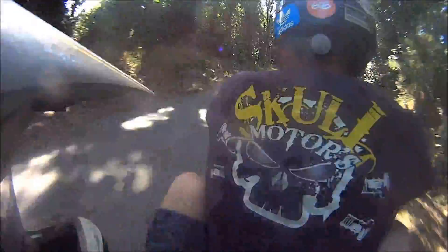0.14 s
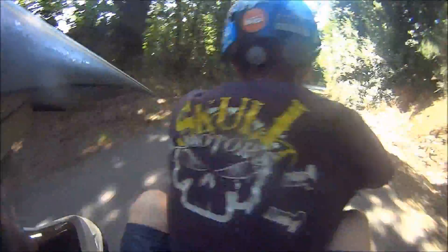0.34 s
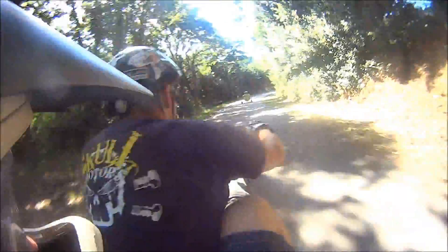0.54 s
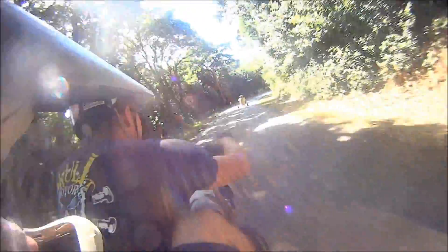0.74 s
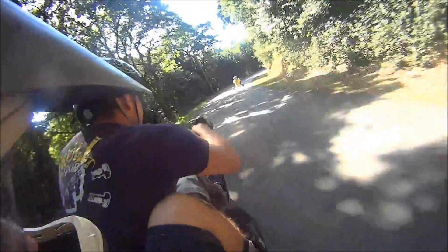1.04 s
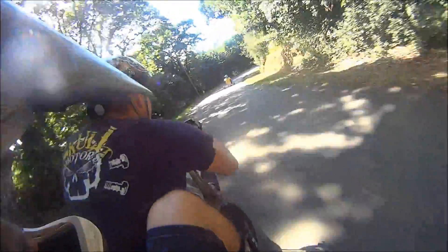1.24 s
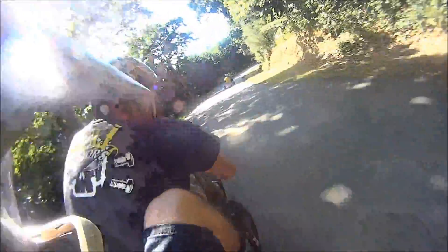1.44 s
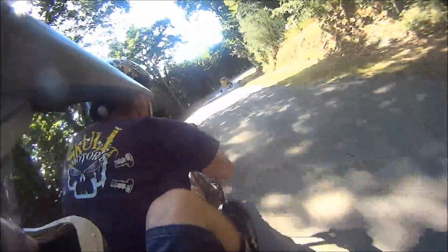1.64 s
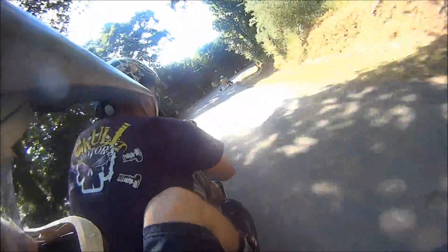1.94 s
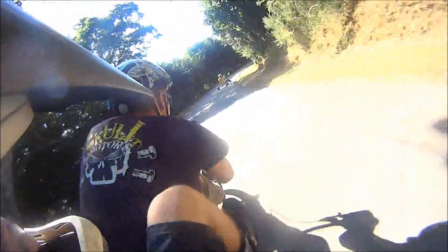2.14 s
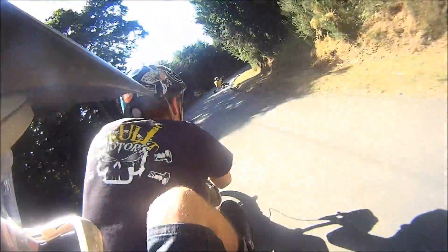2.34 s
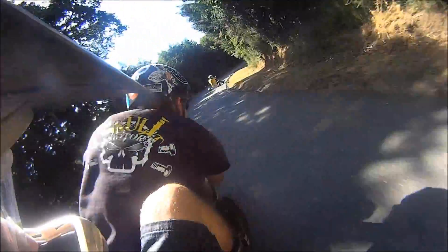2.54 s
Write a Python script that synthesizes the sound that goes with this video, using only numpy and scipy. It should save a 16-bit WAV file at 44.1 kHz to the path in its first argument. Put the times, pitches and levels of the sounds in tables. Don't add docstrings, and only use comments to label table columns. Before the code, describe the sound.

Close behind the wheels, a small stereo camera catches a harsh mid-pitched rolling roar and high whine, a burst of grit and pebble cracks early on, then loud mount knocks late, with wind and frame rumble throughout.

```python
import sys
import numpy as np
from scipy import signal
from scipy.fft import rfft, irfft, next_fast_len
from scipy.io import wavfile

SR = 44100
rng = np.random.default_rng(int(sys.argv[2]) if len(sys.argv) > 2 else 0)


def put_to_file(sound):
    columns = np.atleast_2d(sound).T
    safe = np.clip(columns, -1, 1)
    whole_steps = np.round(safe * 32767)
    wavfile.write(sys.argv[1], SR, whole_steps.astype(np.int16))


def level_to_linear(level):
    exponent = np.asarray(level, float) / 20
    return 10 ** exponent


N = 119070
TIME = np.arange(N) / SR
PAD = next_fast_len(N + 8192)
HZ = np.arange(PAD // 2 + 1) * SR / PAD + 1e-3


def curve(rows, share=1.0):
    s, db = np.transpose(rows)
    v = np.interp(TIME, s, db)
    return share * (v - v.mean())


def drift(rate_hz):
    r = np.exp(-80 * np.pi * rate_hz / SR)
    white = rng.standard_normal(N // 40 + 2002)
    v = signal.lfilter([1], [1, -2 * r, r * r], white)[2000:]
    return np.interp(np.arange(N) / 40, np.arange(len(v)), v / v.std())


def peak(hz, width_hz):
    detuning = (HZ ** 2 - hz ** 2) / (HZ * width_hz * 1.55)
    return (1 / (1 + 1j * detuning)) ** 2


def shaken(modes, phases, own, patchy_db, rate_hz):
    out = 0
    together = drift(rate_hz)
    for (hz, width, left, right), phase in zip(modes, phases):
        a, b = rfft(rng.standard_normal((2, PAD)))
        at_right = np.exp(1j * phase) * (np.sqrt(1 - own) * a + np.sqrt(own) * b)
        pair = np.array([level_to_linear(left) * a, level_to_linear(right) * at_right])
        ringing = irfft(pair * peak(hz, width), PAD)[:, :N]
        out = out + ringing * level_to_linear(patchy_db * (together + 0.38 * drift(rate_hz)))
    return out


def scattered(table, patchy_db, rate_hz):
    hz, left, right = np.transpose(table)
    place, centres = np.log(HZ), np.log(hz)
    white = rfft(rng.standard_normal((2, PAD)))
    white *= level_to_linear(np.array([np.interp(place, centres, db) for db in (left, right)]))
    white *= np.minimum(HZ / hz[0], 1) ** 3 * np.minimum(hz[-1] / HZ, 1) ** 3
    out = 0
    for k in range(len(hz)):
        part = np.sqrt(np.interp(place, centres, np.arange(len(hz)) == k))
        band = irfft(white * part * 1j ** k, PAD)[:, :N]
        out = out + band * level_to_linear(patchy_db * np.array([drift(rate_hz), drift(rate_hz)]))
    return out


# time in seconds, level in dB.
GUST = [(0.0, -27.5), (0.05, -33.5), (0.28, -42), (0.34, -27.5), (0.38, -38.5), (0.45, -30.5), (0.52, -49),
        (0.63, -51.5), (0.65, -42), (0.93, -29), (0.97, -46), (1.12, -31.5), (1.4, -40), (1.42, -38.5),
        (2.05, -23.5), (2.13, -39), (2.48, -27.5), (2.7, -39.5)]
# frequency in Hz, left level in dB, right level in dB.
PORTS = [(45, -24, -19), (113, -23, -20.5), (238, -19.5, -18), (314, -14, -8), (509, -16, -16.5),
         (653, -17.5, -11.5), (904, -29.5, -34.5), (1300, -40, -47)]


def wind():
    turn = 2 * np.pi * np.cumsum(30 + 5.1 * drift(8.6)) / SR
    flap = np.sin(turn) * level_to_linear(-31 + 1.3 * drift(9.0))
    low = shaken([(30, 18, -12, -12)], [0.2], own=0.25, patchy_db=0.8, rate_hz=4)
    buffet = (flap + low) * level_to_linear(curve(GUST, 0.89))
    turbulence = scattered(PORTS, patchy_db=2.0, rate_hz=17.6)
    return buffet + turbulence * level_to_linear(curve(SHAKE, 0.2))


# time in seconds, level in dB.
SPRAY = [
    (.3, -66),
    (0.499, -46.5),
    (.53, -39),
    (.6, -39.5),
    (.66, -46),
    (.8, -46),
    (1., -62.5),
]


def spray():
    s, db = np.transpose(SPRAY)
    white = rng.standard_normal((2, N))
    grit = white * level_to_linear(np.interp(TIME, s, db) + 2.5 * drift(40.0))
    band = signal.butter(2, [5500, 9000], "band", fs=SR, output="sos")
    return signal.sosfilt(band, grit)


# start in seconds, peak level in dB.
TICKS = [(0.398, -28.5), (0.5213, -7.5), (0.6424, -30), (0.665, -8.5), (0.6652, -37.5), (0.7364, -36.5),
         (1.2344, -22), (1.882, -26.5), (1.9759, -44), (2.212, -26), (2.449, -32.5)]


def ticks():
    length, t60_s, top_db = 1500, 0.06, -24
    t = np.arange(length) / SR
    out = np.zeros((2, N + length))
    for s, db in TICKS:
        a, b = rng.standard_normal((2, length)) * np.minimum(t / 0.00067, 1)
        decay = level_to_linear(min(db, top_db) - 9 - 60 * t / t60_s)
        i = int(s * SR)
        out[:, i:i + length] += np.array([a, 0.76 * a + 0.69 * b]) * decay
    band = signal.butter(2, [3800, 7500], "band", fs=SR, output="sos")
    return signal.sosfilt(band, out)[:, :N]


# time in seconds, left snap and right snap in amplitude,
# ring level in dB, rebound as a share of the snap.
KNOCKS = [
    (.2258, -.12, .04, -18.5, 1.6),
    (.3325, -.32, .22, -24, .9),
    (.3386, .28, .3, -24, .7),
    (.3755, -.14, .08, -19, 1.1),
    (.4152, -.28, .12, -11, .9),
    (1.8392, -.55, .25, -10, .4),
    (1.9915, -.03, -.12, -14, .5),
    (2.0418, -.75, .45, -12.5, .22),
    (2.196, -.05, -.1, -24, .5),
]
REBOUND_S = [.0011, .0016]


def knocks():
    length, snap_s = 2600, 0.0014
    ring_hz, crest_s = 300, 0.0065
    ring_side_db = np.array([-4.5, 0])
    t = np.arange(length) / SR
    snap, *back = [np.sin(np.pi * np.clip((t - lag) / snap_s, 0, 1)) ** 2 for lag in [0, *REBOUND_S]]
    swell = (t / crest_s * np.exp(1 - t / crest_s)) ** 2
    ring = swell * np.cos(2 * np.pi * ring_hz * (t - crest_s))
    clack = 1.15 * np.exp(-t / 0.003) * np.sin(2 * np.pi * 830 * t)
    out = np.zeros((2, N + length))
    for s, left, right, db, rebound in KNOCKS:
        blow = np.array([[left], [right]]) * (snap - rebound * np.array(back))
        hollow = np.outer(level_to_linear(db + ring_side_db), ring)
        i = int((s - snap_s / 2) * SR)
        out[:, i:i + length] += blow + hollow + min(left, 0) * min(rebound, 1) * clack
    hits = rng.random((2, N)) < 60 / SR
    jolts = hits * rng.standard_normal((2, N)) * level_to_linear(-34.5 + curve(SHAKE, 0.15))
    jolt_rings = signal.fftconvolve(jolts, ring[None])[:, :N]
    return out[:, :N] + jolt_rings * level_to_linear(np.array([[-8.0], [0.0]]))


# time in seconds, level in dB.
SHAKE = [(0, -35), (.09, -42), (.2, -35), (.45, -38), (.58, -50), (.635, -54), (.66, -30), (.93, -28),
         (1.04, -31), (1.08, -41), (1.11, -27), (1.22, -29), (1.27, -39), (1.55, -34), (2.1, -32),
         (2.3, -38), (2.43, -30), (2.7, -38)]
# frequency in Hz, width in Hz, left level in dB, right level in dB.
FRAME_MODES = [(78, 47, -13.5, -14), (113.5, 76, -18, -19), (153.5, 82, -19, -12), (231.5, 35, -17, -18.5)]
FRAME_PHASE = [.2, .5, 1.4, 1.9]


def frame():
    turn = 2 * np.pi * np.cumsum(155.6 + 10.84 * drift(25.4)) / SR
    tone = np.sin(turn + np.array([[0], [FRAME_PHASE[2]]]))
    drone = tone * level_to_linear(-34.5 + np.array([[-2.0], [2.0]]) + 4.2 * drift(22.0))
    shudder = shaken(FRAME_MODES, FRAME_PHASE, own=0.3, patchy_db=2.5, rate_hz=13)
    return (drone + shudder) * level_to_linear(curve(SHAKE))


# frequency in Hz, left level in dB, right level in dB.
HISS = [(854, -29, -19.5), (1900, -7, -13), (2680, -19, -12.5), (3490, -20.5, -22.5), (4170, -22, -33.5),
        (6120, -33.5, -35), (9000, -43.5, -44.5), (11500, -56.5, -49.5)]


def hiss():
    return scattered(HISS, patchy_db=-0.6, rate_hz=28) * level_to_linear(curve(SLIDE, 0.16))


# time in seconds, level in dB.
SLIDE = [(0, -38.5), (.15, -41.5), (.38, -41), (.52, -35.5), (.58, -33.5), (.63, -34.5), (.68, -31),
         (.9, -33), (1.1, -34.5), (1.25, -31.5), (1.6, -31), (1.78, -31), (1.84, -34.5), (1.9, -31.5),
         (2.05, -32.5), (2.2, -30), (2.7, -32.5)]
# frequency in Hz, width in Hz, left level in dB, right level in dB.
WHINE_MODES = [(3810, 160, -23, -22.5), (4230, 730, -26, -20), (4830, 208, -18, -17),
               (5097, 324, -15.5, -19), (5840, 1120, -26, -31.5), (7360, 460, -40.5, -33.5),
               (8860, 300, -46, -38)]
WHINE_PHASE = [2.5, 2.8, -.3, .1, 1.3, 1.5, 1.8]


def whine():
    return shaken(WHINE_MODES, WHINE_PHASE, own=0.12, patchy_db=0.9, rate_hz=45) * level_to_linear(curve(SLIDE))


# time in seconds, level in dB.
ROLL = [
    (0, -19),
    (.3, -16),
    (.55, -15.5),
    (1, -14.5),
    (1.35, -13),
    (1.55, -17),
    (2.1, -15),
    (2.45, -13.5),
    (2.7, -17),
]
# frequency in Hz, width in Hz, left level in dB, right level in dB.
ROAR_MODES = [(983, 118, -11.5, -28), (1293, 210, -9.5, -31.5), (1454, 155, -1, -7), (1531.3, 125.6, 6, 3),
              (1622, 110, -3.5, -9), (2006, 200, -5.5, -15), (2305, 100, -11.5, -14), (2536, 183, -9, -9.5),
              (2830, 465, -16.5, -14), (3270, 136, -19, -18)]
ROAR_PHASE = [.3, -.5, .5, .1, -.1, .4, -1.9, -2.2, -2.5, -1.5]


def roar():
    return shaken(ROAR_MODES, ROAR_PHASE, own=0.025, patchy_db=0.84, rate_hz=8) * level_to_linear(curve(ROLL))


def scene():
    wheels = roar() + whine() + hiss()
    return wheels + frame() + wind() + knocks() + ticks() + spray()


def band_limit(x):
    return signal.sosfilt(signal.butter(12, 10880, fs=SR, output="sos"), x)


def record(dry):
    limit_db, release_db_per_s = -6.5, 246
    level_db = 20 * np.log10(np.abs(dry).max(axis=0) + 1e-9)
    over = np.maximum(level_db - limit_db, 0)
    ramp = release_db_per_s * TIME
    held = np.maximum.accumulate(over + ramp) - ramp
    duck = signal.lfilter([0.01], [1, -0.99], held)
    limited = dry * level_to_linear(-duck)
    return band_limit(limited)


dry = scene()
out = record(dry)
put_to_file(out)
```